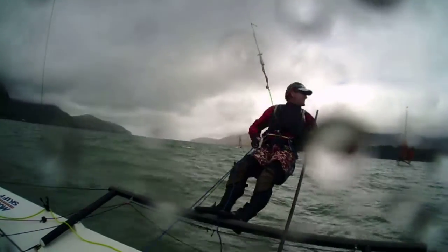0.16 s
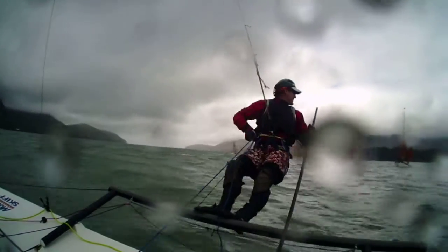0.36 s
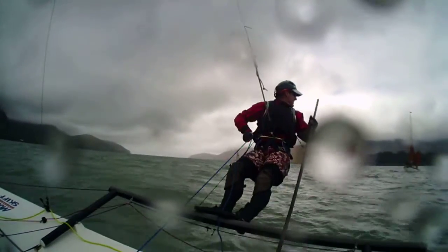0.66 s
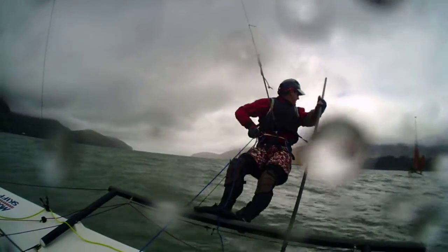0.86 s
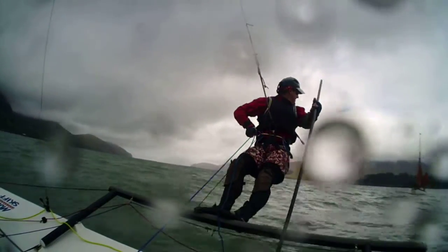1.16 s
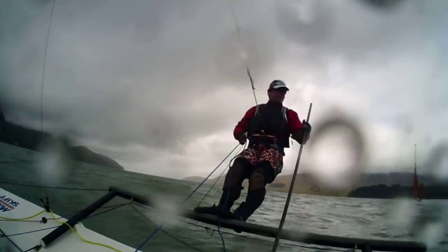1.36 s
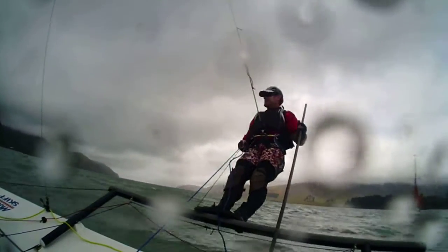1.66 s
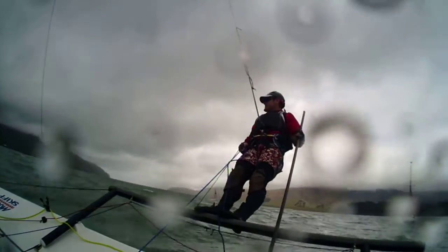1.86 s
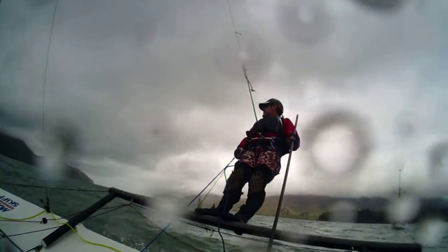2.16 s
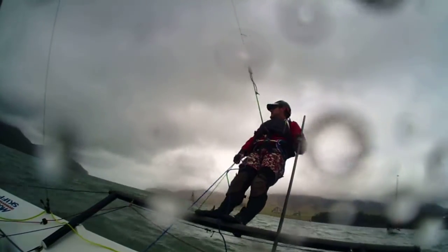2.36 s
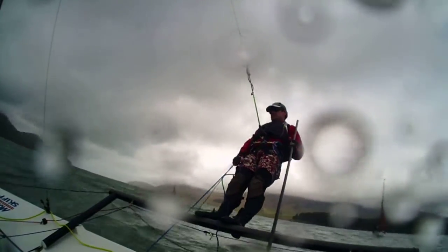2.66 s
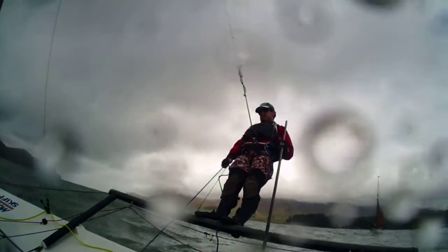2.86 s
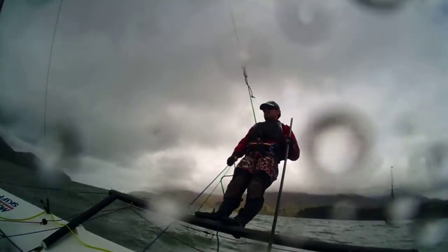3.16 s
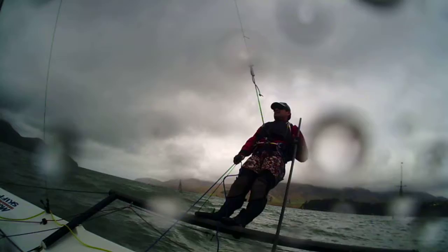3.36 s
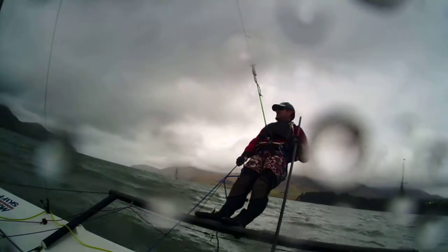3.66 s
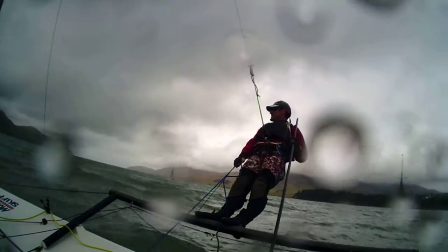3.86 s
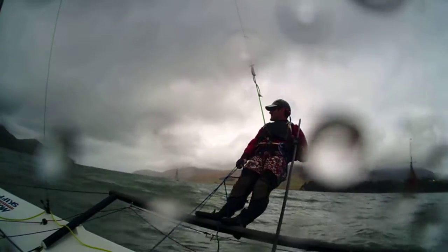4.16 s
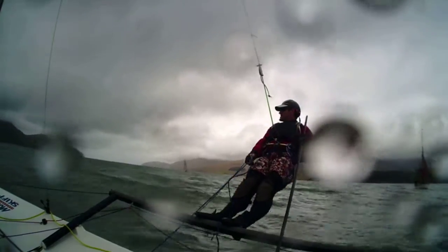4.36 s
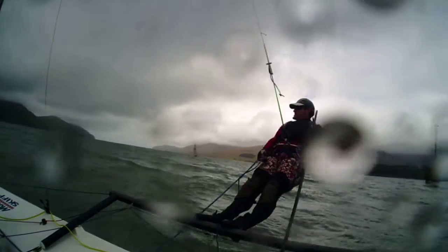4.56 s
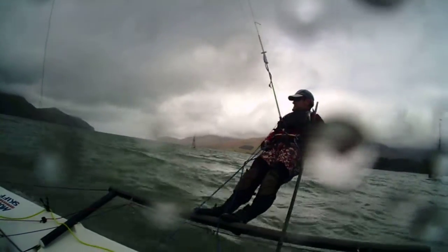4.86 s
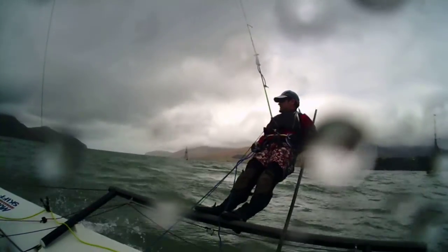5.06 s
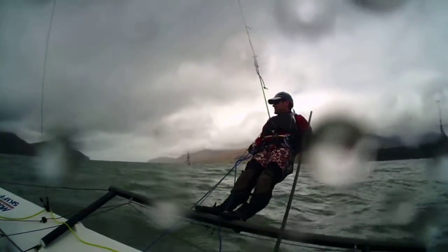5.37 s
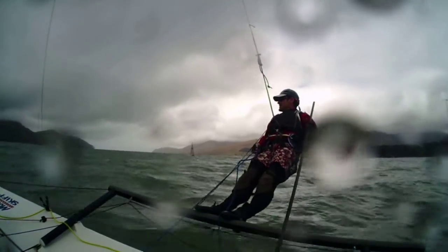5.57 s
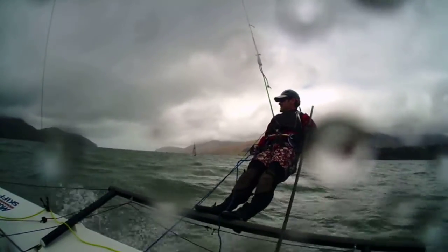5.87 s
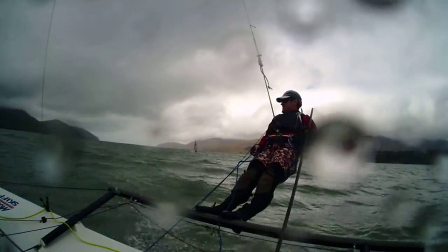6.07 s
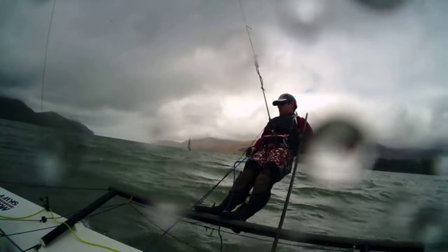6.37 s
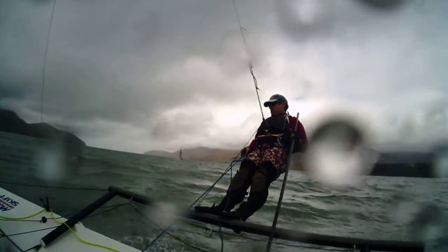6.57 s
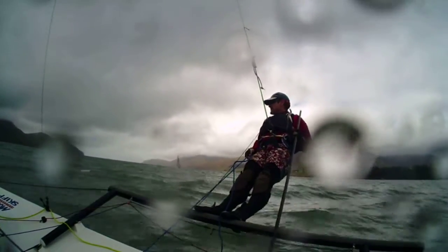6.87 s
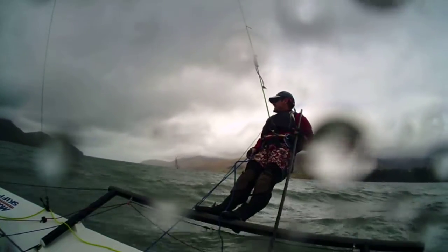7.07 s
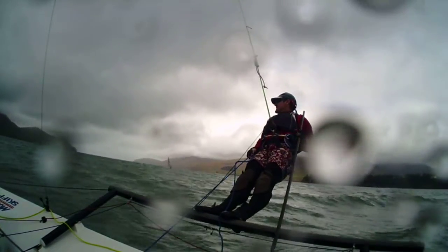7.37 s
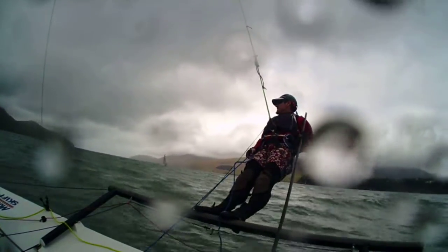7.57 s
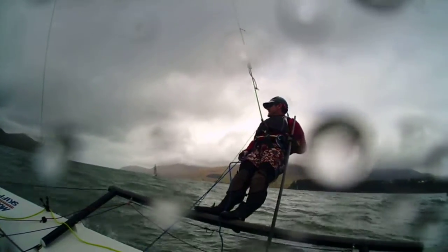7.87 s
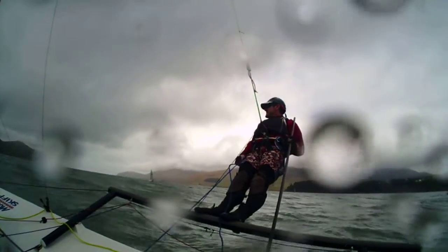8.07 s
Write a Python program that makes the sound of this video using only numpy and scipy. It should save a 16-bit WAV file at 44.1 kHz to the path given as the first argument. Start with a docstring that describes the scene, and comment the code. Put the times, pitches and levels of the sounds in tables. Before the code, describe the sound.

A small sailing boat planes over choppy water, heard through a muffling waterproof housing fixed to its frame. Wash, gurgle and light spray run throughout with irregular wave slaps. A metal shackle snaps, then rope hauls rasp and creak over a clicking ratchet. Mid-way two heavy knocks surround a brief rope squeal; later come scattered knocks, another snap and more ratchet clicks.

```python
"""Water rushes and hisses along a planing dinghy's hull while waves slap it, then rope work takes over.
Filtered noise makes the flow; clusters of tiny impacts make slaps and spray; chirping sines make bubbles.
Noise bursts with ringing sines make knocks, pawl clicks and shackle snaps. The crew hauls a sheet through
a ratchet block as rasping slips and creaks, and eases it once with a squeal of locked harmonics.
The microphone sits in a waterproof housing fixed to the frame; the hardest blows overload its input."""
import sys
import numpy as np
from scipy import signal
from scipy.fft import rfft, irfft, next_fast_len
from scipy.io import wavfile
from scipy.ndimage import uniform_filter1d, map_coordinates

SR = 44100
rng = np.random.default_rng(int(sys.argv[2]) if len(sys.argv) > 2 else 0)


def waveform_to_disk(signal):
    """Save audio, clipped to [-1, 1], as 16-bit WAV at the path in sys.argv[1]."""
    frames = np.transpose(np.atleast_2d(signal))
    scaled = np.clip(frames, -1, 1) * 32767
    samples = np.round(scaled).astype(np.int16)
    wavfile.write(sys.argv[1], SR, samples)


N = 362061
TIME_S = np.arange(N) / SR
HIT_S = np.arange(SR // 4) / SR  # time axis of one blow
BUBBLE_S = np.arange(SR // 12) / SR  # time axis of one bubble


def amp(db):
    """Decibels to gain."""
    return 10 ** (np.asarray(db) / 20)


def unit(x):
    """x at rms 1."""
    return x / np.sqrt(np.mean(x ** 2) + 1e-20)


def sine(hz):
    """A sine that follows a pitch curve in Hz."""
    return np.sin(2 * np.pi * np.cumsum(hz) / SR)


def curve(rows):
    """Straight lines through (time, value) rows, one value per sample."""
    start_s, value = np.transpose(rows)
    return np.interp(TIME_S, start_s, value)


def wobble(rate):
    """A smooth random curve through normally distributed knots, rate knots a second."""
    knots = rng.standard_normal(int(N * rate / SR) + 4)
    return map_coordinates(knots, [np.arange(N) * rate / SR])


def add(track, start_s, sound):
    """Mix a sound into the track at start_s."""
    part = track[max(round(start_s * SR), 0):][:len(sound)]
    part += sound[:len(part)]


# Resonances of frame and housing: centre_hz, width_hz, boost_db
HOUSING_MODES = [(150, 73, 6.5), (201.6, 29.6, 8), (353.6, 66, 12), (422, 82, 6), (681.5, 293, 14),
                 (753, 23, 4), (882, 140, 4.5), (1110, 212, 6.5), (1296, 110, 5.5), (2050, 75, 2.5),
                 (2258, 110, 3), (2668, 80, 4.5), (4220, 1400, 5.5)]
WALL_HZ = 5446  # the housing lets little through above this


def housed(x, spectrum):
    """x coloured by a source spectrum and rung through the housing (causal, minimum phase)."""
    m = 2 * next_fast_len(len(x) // 2 + 4096)
    hz = np.fft.rfftfreq(m, 1 / SR)
    source_hz, source_db = np.transpose(spectrum)
    db = np.interp(np.log(hz + 1), np.log(source_hz), source_db)
    for centre_hz, width_hz, boost_db in HOUSING_MODES:
        db += boost_db / (1 + (2 * (hz - centre_hz) / width_hz) ** 2)
    db -= 10 * np.log10(1 + (hz / WALL_HZ) ** 48)
    # folding the cepstrum forward in time gives the minimum phase
    cepstrum = irfft(np.log(amp(db) + 1e-6))
    cepstrum[1:m // 2] *= 2
    cepstrum[m // 2 + 1:] = 0
    response = np.exp(rfft(cepstrum))
    return irfft(rfft(x, m) * response, m)[:len(x)]


def patter(rate, spread_db):
    """Random tiny impacts of uneven size and either sign, rate a second on average, at rms 1."""
    chance, size, push = rng.random(N), rng.standard_normal(N), rng.standard_normal(N)
    strength = amp(spread_db * np.clip(size, -2, 2))
    return unit((chance < rate / SR) * strength * np.sign(push))


def blow(spectrum, t60, tail_db, tail_t60):
    """A chattering contact that dies fast, then a weak rattle of the rig; peaks near 1."""
    decay = amp(-60 * HIT_S / t60) + amp(tail_db - 60 * HIT_S / tail_t60)
    sound = housed(rng.standard_normal(len(HIT_S)) * decay, spectrum)
    loudest_power = uniform_filter1d(sound ** 2, SR // 100).max()
    return sound / (2 * np.sqrt(loudest_power))


def modes(table):
    """A struck metal part: its modes build up through the frame and decay, each at a slightly new strength."""
    build = 1 - np.exp(-(HIT_S / .002) ** 3)
    ring = np.zeros(len(HIT_S))
    for pitch_hz, level_db, t60_s in table:
        decay = amp(level_db + rng.normal(0, 0.75) - 60 * HIT_S / t60_s)
        ring += decay * np.sin(2 * np.pi * pitch_hz * HIT_S)
    return build * ring


# Colour of the frame's low shaking: pitch_hz, level_db
BUFFET_COLOUR = [(15, -9.5), (45, -6), (90, -6), (200, -21.5), (600, -68.5)]


def rumble():
    """Low shaking of the frame as housed noise, at rms 1."""
    return unit(housed(rng.standard_normal(N), BUFFET_COLOUR))


def bubbles(count, hz, spread, cycles, rise):
    """Air pockets scattered in time; each falls 20 dB over some cycles while its pitch rises by a fraction."""
    out = np.zeros(N)
    for when, pitch, size in rng.random((count, 3)):
        turns = hz * np.exp(spread * 2 * (2 * pitch - 1)) * BUBBLE_S
        age = turns / cycles
        envelope = amp(6.9 * size - 20 * age) * (1 - np.exp(-turns / 2))
        add(out, when * N / SR, envelope * np.sin(2 * np.pi * turns * (1 + rise * age / 2)))
    return out


# Colour of turbulent flow: pitch_hz, level_db
WASH_COLOUR = [(30, 0), (120, -1), (270, -5), (700, -11.5), (1350, -1.5), (1650, -13.5), (2800, -11),
               (3100, -26), (4700, -24.5), (5700, -34)]
# Colour of water striking the hull, for chop, bubbles and waves: pitch_hz, level_db
SLAP_COLOUR = [(50, -8.5), (150, 2), (270, -2.5), (700, -4), (1350, 1.5), (1650, -11.5), (2600, -18),
               (3200, -29.5), (5200, -43.5)]
# Colour of flying spray: pitch_hz, level_db
SPRAY_COLOUR = [(900, -26), (1800, -6), (2800, 6.5), (3200, -1), (4600, -6), (5600, -6)]
# Hiss of spray following the boat's speed, in stretches joined by straight lines: start_s, level_db
SPRAY_FLOW = [
    [(0.0, -64.5), (0.352, -61.5), (1.65, -58)],
    [(2.7, -56), (3.328, -56), (3.7, -59.5)],
    [(4.9, -64), (6.41, -59), (7.7, -61.5)],
]
SPRAY_TRIM_DB = 2.5  # added to the spray curve
WATER_DB, WATER_GROWS = -41.5, 0.52  # reference level of the rush; its dB per dB of spray
WIND_DB = -53  # mean level of the wind's shaking


def rushing_water():
    """Turbulent flow, chop, bubbles and spray grow with speed; wind shakes the frame."""
    spray_db = curve([row for stretch in SPRAY_FLOW for row in stretch])
    water_db = WATER_DB + WATER_GROWS * (spray_db - spray_db.mean())

    flow = unit(housed(rng.standard_normal(N), WASH_COLOUR))
    flow *= amp(water_db + 1.7 * wobble(14))

    small_waves = patter(rate=450, spread_db=2.0) * amp(4.6 * wobble(26))
    chop = unit(housed(small_waves, SLAP_COLOUR)) * amp(water_db - 1.5)

    air = bubbles(count=420, hz=1148, spread=.25, cycles=12, rise=0.072)
    gurgle = unit(housed(air, SLAP_COLOUR)) * amp(water_db - 7.5)

    spray = unit(housed(patter(rate=7800, spread_db=7.5), SPRAY_COLOUR))
    spray *= amp(spray_db + SPRAY_TRIM_DB + 0.47 * wobble(9.1))

    wind = rumble() * amp(WIND_DB + 0.81 * wobble(6))
    return flow + chop + gurgle + spray + wind


# Big gulps of trapped air beside the hull: start_s, level_db (relative), pitch_hz
GULP_EVENTS = [(0.462, -26, 1280), (.911, -21.5, 1365), (1.075, -29, 776), (1.679, -20.5, 1363),
               (1.697, -19.5, 1320), (5.346, -29, 1336), (5.563, -24, 1310), (7.438, -13, 1357),
               (7.678, -23, 1313)]


def gulps():
    """Large air pockets swell and ring briefly at an unsteady pitch."""
    out = np.zeros(N)
    swell = BUBBLE_S / .006 * np.exp(1 - BUBBLE_S / .006)  # fullest after 6 ms
    for start_s, level_db, pitch_hz in GULP_EVENTS:
        unsteady_hz = pitch_hz * (1 + 0.037 * wobble(370)[:len(BUBBLE_S)])
        add(out, start_s, amp(level_db - 7) * swell * sine(unsteady_hz))
    return out


# Colour of small bright contacts, for drops, shackle and snagging fibres: pitch_hz, level_db
TICK_COLOUR = [(300, -24.5), (1000, -6.5), (1600, 3), (2100, 6), (3300, -3), (4500, -6), (5600, -14.5)]
# Drops of spray tapping the housing: start_s, level_db (relative)
DROP_EVENTS = [(1.905, -28), (1.944, -30), (1.992, -29), (2.9482, -30.5), (3.381, -35.5), (4.22, -38),
               (4.2936, -38), (4.4109, -35.5), (4.895, -37.5), (4.968, -41), (6.397, -26.5), (6.7424, -31),
               (6.8064, -37)]


def drops():
    """Flying spray taps the housing itself: short, bright noise bursts."""
    out = np.zeros(N)
    for start_s, level_db in DROP_EVENTS:
        tap = blow(TICK_COLOUR, t60=0.016, tail_db=-16.0, tail_t60=.06)
        add(out, start_s, amp(level_db + 2.0) * tap)
    return out


# Swells of drumming on the hull, mostly waves running along it; at 1.963, 2.495 and 4.692 s the hull shakes
# under the loaded rope: crest_s, level_db (relative), half_length_s (alone, 7 dB down there)
WAVE_EVENTS = [(0.258, -34.5, .04), (0.737, -33.5, 0.1), (0.89, -34, 0.096), (1.082, -31, 0.024),
               (1.72, -24.5, 0.034), (1.963, -21.5, 0.043), (2.495, -25, 0.069), (2.78, -30.5, 0.083),
               (3.123, -33, 0.078), (3.262, -30.5, 0.063), (3.519, -29, 0.053), (4.301, -29.5, 0.028),
               (4.692, -25, 0.073), (4.883, -31.5, 0.056), (5.38, -30, 0.032), (5.508, -20.5, 0.05),
               (5.972, -27.5, 0.069), (6.159, -23.5, .035), (6.466, -33, 0.024), (6.793, -23.5, 0.045),
               (7.011, -29.5, 0.023), (7.477, -22.5, 0.042), (7.664, -29, 0.031), (7.848, -34.5, 0.093)]
HEAVE_DB = -16.5  # low rumble of the hull under a wave, against its drumming


def wave_slaps():
    """Each swell, mostly a wave, drums on the hull as a swelling cluster of small impacts, and heaves it."""
    power = np.zeros(N)
    for crest_s, level_db, half_length_s in WAVE_EVENTS:
        distance = (TIME_S - crest_s) / half_length_s
        power += amp(level_db) ** 2 / (1 + distance ** 2 / 2) ** 4
    impacts = patter(rate=1300, spread_db=2) * amp(1.8 * wobble(70))
    drumming = unit(housed(impacts, SLAP_COLOUR))
    return np.sqrt(power) * (drumming + amp(HEAVE_DB) * rumble()) * amp(-2.0)


# Colour of a blunt blow, also in the squeal's rasp: pitch_hz, level_db
KNOCK_COLOUR = [(60, -19.5), (350, -15), (550, -11), (850, 3), (1300, 4.5), (1700, -6), (2500, -8.5),
                (3300, -27), (5200, -34.5)]
# Colour of the hull's thud: pitch_hz, level_db
THUD_COLOUR = [(40, -12), (130, -6.5), (260, -4.5), (400, 1.5), (600, -14), (1500, -58)]
# Blunt blows on hull and frame, save the row at 4.22 s, a drop of spray that also taps among the drops, and the
# row at 6.187 s, the body of the shackle's snap at 6.184 s; thud # and ring levels are relative to the blow:
# start_s, level_db (relative), thud_db, ring_hz, ring_db
KNOCK_EVENTS = [(0.2, -20, -10, 643, 2.5), (1.403, -23, -10, 1113, -2), (1.554, -26, -25, 700, 5),
                (1.832, -15, -4.5, 1160, -15), (1.963, -6.5, -17, 703, 6.5), (2.282, -13, 2, 940, 0),
                (2.445, -8, -6.5, 766, -9), (2.56, -4, -8, 953, -5), (4.22, -20.5, -15, 1110, -8),
                (4.411, -17, -12.5, 1126, -3), (4.484, 2.5, -29, 1157, 0), (4.492, -6, -30, 1153, 5),
                (4.646, 4, -18.5, 858, -7), (4.84, -19, -6.5, 735, -13), (4.968, -20.5, -5, 750, -10),
                (5.064, -22, -16, 750, -3), (5.282, -19, -4.5, 1330, -3), (6.13, -14.5, -16, 800, -5),
                (6.187, -6, -20, 994, -3), (6.277, -15, -20, 1103, 0), (6.376, -18, -17, 663, -7.5),
                (6.62, -24.5, -2.5, 1303, 1), (6.953, -26, -6, 1256, 4.5), (6.984, -17.5, -14, 820, 4),
                (7.188, -15.5, -11, 708, 2), (7.368, -22, -4.5, 667, -12), (7.442, -12.5, -19, 1194, -3),
                (7.459, -7.5, -32, 1100, 0.5), (8.064, 1, -21, 720, 3)]
KNOCK_T60_S = 0.075  # decay of the contact noise


def knocks():
    """Blunt blows leave one mode of the frame ringing, with a thud of varying weight in the hull."""
    out = np.zeros(N)
    build = 1 - np.exp(-HIT_S / 0.00073)
    for start_s, level_db, thud_db, ring_hz, ring_db in KNOCK_EVENTS:
        decay = amp(ring_db - 60 * HIT_S / (1.01 * KNOCK_T60_S))
        ring = decay * build * np.sin(2 * np.pi * ring_hz * HIT_S)
        contact = blow(KNOCK_COLOUR, KNOCK_T60_S, tail_db=-27, tail_t60=0.067)
        add(out, start_s, amp(level_db - 4.5) * (contact + ring))
        thud = blow(THUD_COLOUR, t60=.055, tail_db=-28.0, tail_t60=0.088)
        add(out, start_s, amp(level_db + thud_db + 0.5) * thud)
    return out


# Colour of hard metal contacts, also in the squeal's rasp: pitch_hz, level_db
CLICK_COLOUR = [(150, -12), (600, -17.5), (1100, -6), (1650, -3.5), (2200, 5.5), (3300, -13), (4500, -18),
                (5500, -30.5)]
# Pawl clicks of the ratchet block: start_s, level_db (relative)
CLICK_EVENTS = [(2.0143, -13.5), (2.1665, -12.5), (2.2226, -12.5), (2.2662, -11), (2.3113, -11.5),
                (2.3466, -16), (2.386, -10.5), (2.4399, -12), (2.482, -7.5), (2.524, -14), (2.5534, -10.5),
                (2.8416, -16), (7.4576, -15), (7.7592, -13.5), (7.796, -23.5), (7.9857, -16.5),
                (8.0321, -13), (8.0646, -14.5), (8.115, -15), (8.1856, -9.5)]
# The pawl's ring: pitch_hz, level_db, t60_s
PAWL_MODES = [(2060, -15.5, 0.073), (2220, -19, 0.099), (2570, -21.5, 0.068), (4270, -25, 0.054)]
# A shackle snaps against the frame: start_s, level_db (relative)
CLACK_EVENTS = [(1.7449, -0.5), (6.184, 0.5)]
# The shackle's own ring: pitch_hz, level_db, t60_s
SHACKLE_MODES = [(830, -19.5, 0.22), (2290, -21, 0.06), (2990, -35.5, 0.21), (3375, -12, .025),
                 (4170, -22, 0.03)]


def fittings():
    """The ratchet's pawl clicks; twice a shackle hits hard and rings."""
    out = np.zeros(N)
    for start_s, level_db in CLICK_EVENTS:
        click = blow(CLICK_COLOUR, t60=0.047, tail_db=-27, tail_t60=.1)
        add(out, start_s, amp(level_db - 3.0) * (click + modes(PAWL_MODES)))
    for start_s, level_db in CLACK_EVENTS:
        clack = blow(CLICK_COLOUR, t60=0.043, tail_db=-34.5, tail_t60=0.086)
        add(out, start_s, amp(level_db) * (clack + modes(SHACKLE_MODES)))
        bright_edge = blow(TICK_COLOUR, t60=0.023, tail_db=-34.5, tail_t60=0.11)
        add(out, start_s, amp(level_db - 9) * bright_edge)
    return out


def stroke(start_s, length_s, attack_s, release_s):
    """Gain of one run of rope: it rises, holds until its length is up and comes to rest."""
    t = TIME_S - start_s
    rest = np.exp(-(np.maximum(t - length_s, 0) / release_s) ** 2)
    return np.clip(t / attack_s, 0, 1) * rest


SHUDDER_DB, SHUDDER_LAG_S = -16.5, .05  # frame's shaking against the load; its smoothing time


def shudder(load):
    """The frame shakes with the load on the rope, a little late."""
    keep = np.exp(-1 / (SHUDDER_LAG_S * SR))
    late_load = signal.lfilter([1 - keep], [1, -keep], load)
    return amp(SHUDDER_DB) * late_load * rumble()


# Colour of braid rasping over the sheave: pitch_hz, level_db
ROPE_COLOUR = [(80, -7), (400, -12), (600, -16.5), (950, 1.5), (1300, -2.5), (1650, -11.5), (2400, -14.5),
               (3300, -31), (5200, -45.5)]
# Resonances of the loaded, creaking block: pitch_hz, waver_hz, level_db (relative)
CREAK_MODES = [(383.5, 14, -22), (747, 22, -8.5), (883, 25, -8.5), (1113, 21.97, -4), (2250, 260, -18.5)]
# Hauls on the sheet; sag is the dB lost by the end (negative gains), creak is against the rasp:
# start_s, length_s, level_db, sag_db, creak_db
PULL_EVENTS = [(1.749, 0.097, -22.5, 10.5, 1.5), (1.921, .11, -32, -7.5, 0.5), (2.167, 0.2, -20.5, 4, -5.5),
               (2.39, 0.043, -27, 5, -5), (2.446, 0.083, -20, 0.5, -5), (2.55, 0.088, -18.5, 10.5, -1),
               (2.837, 0.092, -22, 11.5, 0), (7.761, 0.074, -32, 0.5, 4), (7.988, 0.16, -21.5, 1.5, 2),
               (8.186, .05, -23.5, 0, 1)]
PULL_ATTACK_S, PULL_RELEASE_S = 0.0069, .02  # the rope takes up, and comes to rest


def sheet():
    """Braid rasps over the sheave in small slips that set the block creaking; most hauls tire as they go."""
    rasp = unit(housed(patter(rate=820, spread_db=4.5), ROPE_COLOUR)) * amp(1.3 * wobble(45))
    # snagging fibres add a sparser, brighter crackle
    rasp += unit(housed(patter(rate=280, spread_db=8), TICK_COLOUR)) * amp(-23)

    creak = np.zeros(N)
    for pitch_hz, waver_hz, level_db in CREAK_MODES:
        strength = amp(level_db + 4.2 * wobble(50))
        creak += strength * sine(pitch_hz + waver_hz * wobble(130))
    creak = unit(creak)

    out, load = np.zeros(N), np.zeros(N)
    for start_s, length_s, level_db, sag_db, creak_db in PULL_EVENTS:
        progress = np.clip((TIME_S - start_s) / length_s, 0, 1)
        effort = amp(level_db - sag_db * progress)
        effort *= stroke(start_s, length_s, PULL_ATTACK_S, PULL_RELEASE_S)
        out += effort * (rasp + amp(creak_db) * creak)
        load += effort
    return out + shudder(load)


# The eased sheet's slip rate over its sheave, before jitter: start_s, pitch_hz
SLIP_RATE = [(4.54, 424), (4.562, 432.8), (4.572, 448.1), (4.592, 509.4), (4.616, 529.2), (4.766, 556),
             (4.79, 527)]
# How strongly the block radiates each partial: pitch_hz, level_db
BLOCK_RADIATION = [(370, -18), (550, -10.5), (880, 3), (1100, -0.5), (1400, -6), (1650, -20.5), (1880, -17),
                   (2100, -8), (2280, -6), (2550, -18), (2750, -13), (3300, -26)]
SQUEAL_START_S, SQUEAL_HOLD_S = 4.533, .2
SQUEAL_ATTACK_S, SQUEAL_RELEASE_S = 0.021, 0.052
SQUEAL_TONE_DB, SQUEAL_RASP_DB, SQUEAL_LOAD_DB = -17, -22, -21  # gains of tone, rasp, pull on the frame
# the slips lock most cleanly here: when, how long either side, how far the rasp drops
LOCK_S, LOCK_HALF_S, LOCK_DB = 4.62, .025, 8


def squeal():
    """Fast slips lock into a tone whose pitch follows the rope's speed, over the braid's rasp."""
    slip_hz = curve(SLIP_RATE)
    run = stroke(SQUEAL_START_S, SQUEAL_HOLD_S, SQUEAL_ATTACK_S, SQUEAL_RELEASE_S)
    locked = np.exp(-((TIME_S - LOCK_S) / LOCK_HALF_S) ** 2)

    phase = 2 * np.pi * np.cumsum(slip_hz * (1 + .01 * wobble(300))) / SR
    block_hz, block_db = np.transpose(BLOCK_RADIATION)
    tone = np.zeros(N)
    for k in range(1, 6):
        partial_db = np.interp(k * slip_hz, block_hz, block_db) + 2.9 * wobble(130)
        tone += amp(partial_db) * np.sin(k * phase)

    rasp = unit(housed(patter(rate=1200, spread_db=5.5), CLICK_COLOUR)) * amp(-5.0)
    rasp += unit(housed(patter(rate=1500, spread_db=5), KNOCK_COLOUR))

    sound = tone * amp(SQUEAL_TONE_DB) + rasp * amp(SQUEAL_RASP_DB - LOCK_DB * locked)
    return run * sound + shudder(run * amp(SQUEAL_LOAD_DB))


def scene():
    """Water, hull and rigging at the one microphone."""
    water = rushing_water() + wave_slaps() + gulps() + drops()
    rigging = knocks() + fittings() + sheet() + squeal()
    return (water + rigging)[None]


TOP_HZ = 15900  # band limit


def record(dry):
    """The input overloads on the hardest blows; nothing is kept above the band limit."""
    ceiling = .72
    clipped = dry / (1 + np.abs(dry / ceiling) ** 12) ** (1 / 12)
    m = next_fast_len(N + SR // 2)
    in_band = np.fft.rfftfreq(m, 1 / SR) < TOP_HZ
    return irfft(rfft(clipped, m) * in_band, m)[..., :N]


dry = scene()
out = record(dry)
waveform_to_disk(out)
```